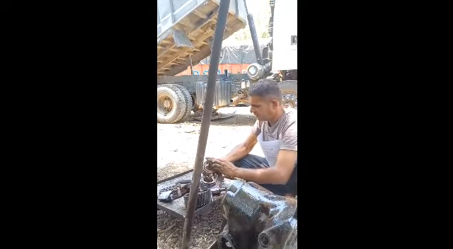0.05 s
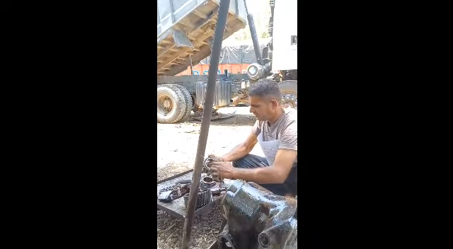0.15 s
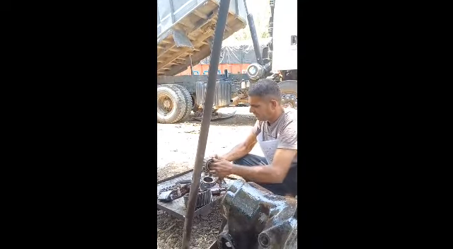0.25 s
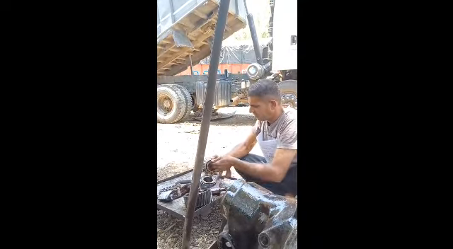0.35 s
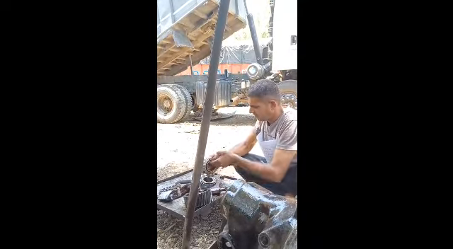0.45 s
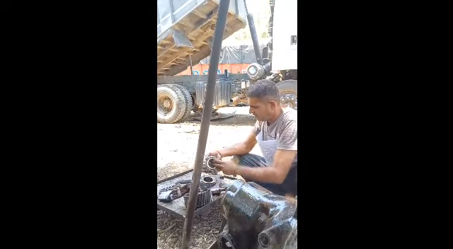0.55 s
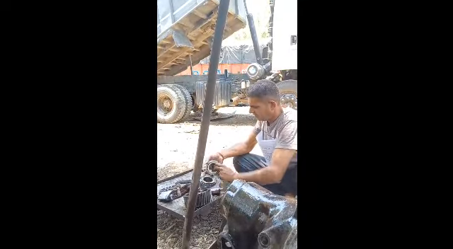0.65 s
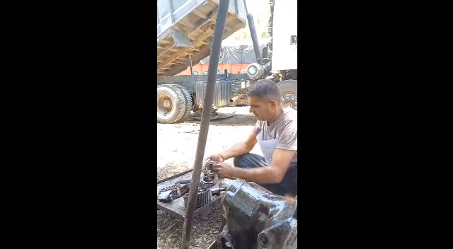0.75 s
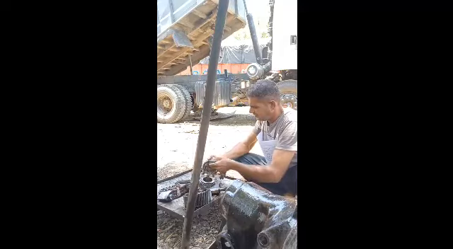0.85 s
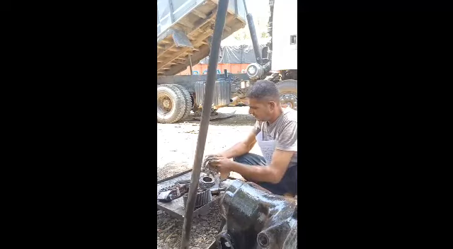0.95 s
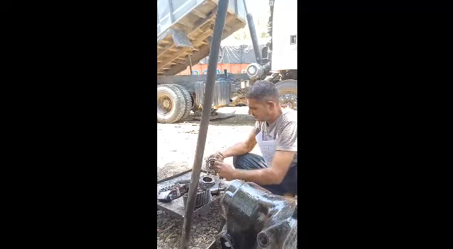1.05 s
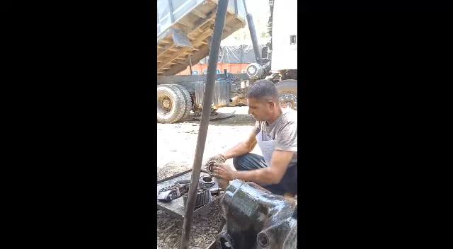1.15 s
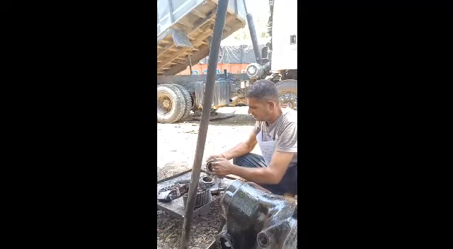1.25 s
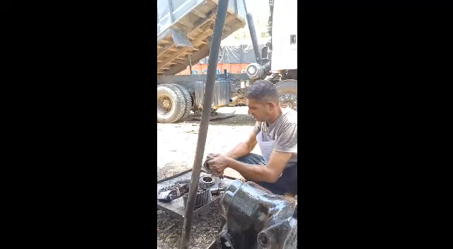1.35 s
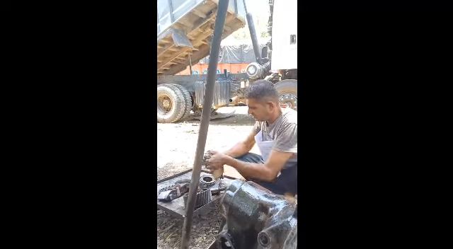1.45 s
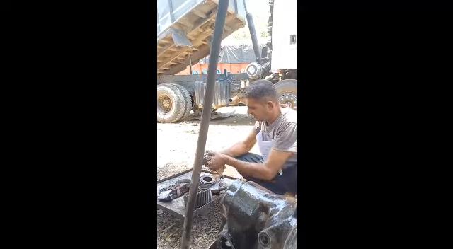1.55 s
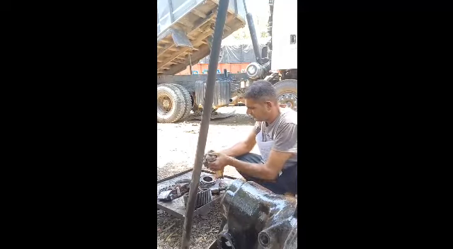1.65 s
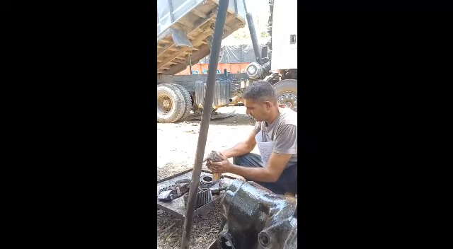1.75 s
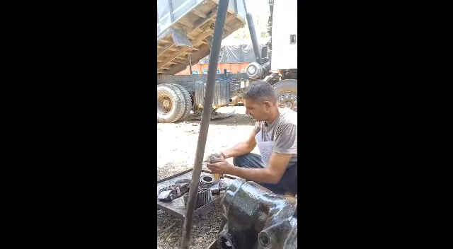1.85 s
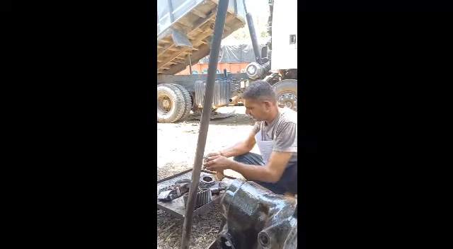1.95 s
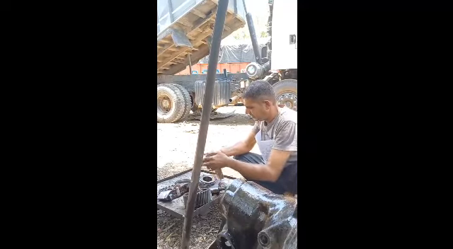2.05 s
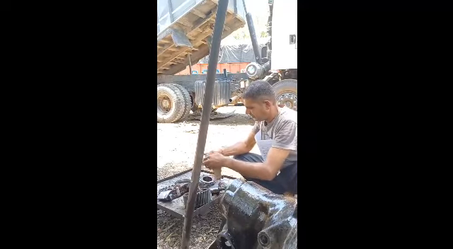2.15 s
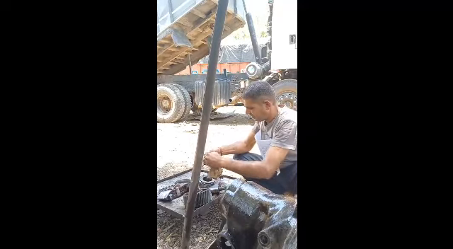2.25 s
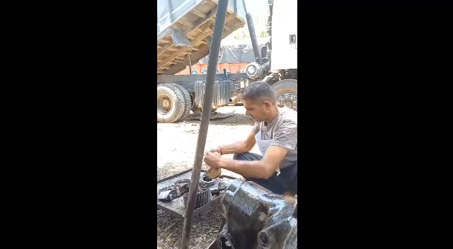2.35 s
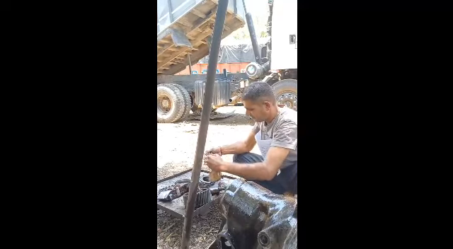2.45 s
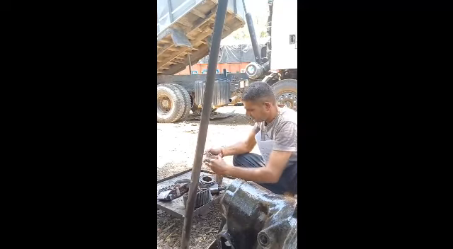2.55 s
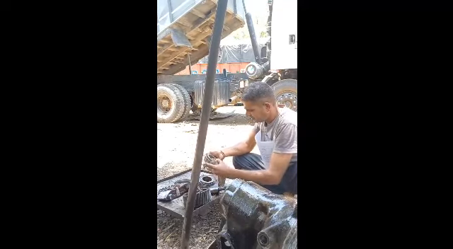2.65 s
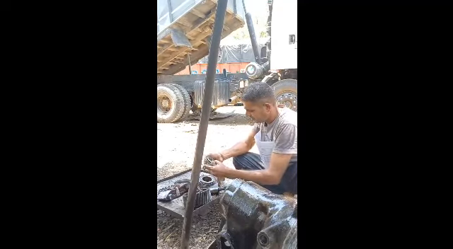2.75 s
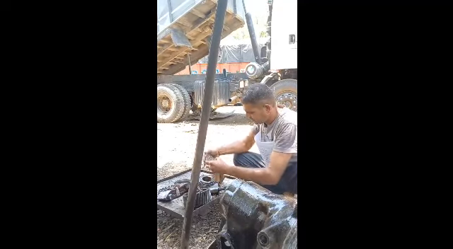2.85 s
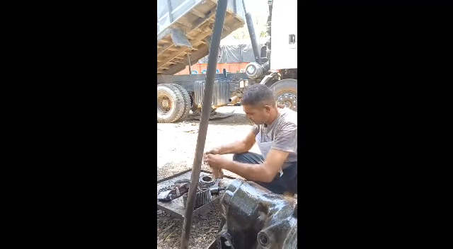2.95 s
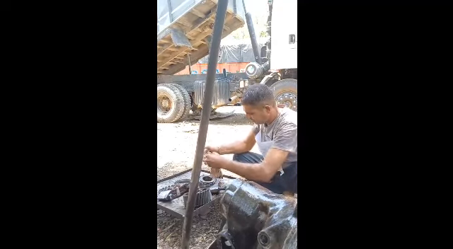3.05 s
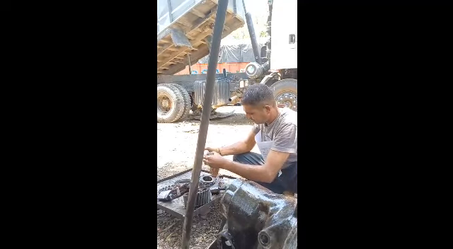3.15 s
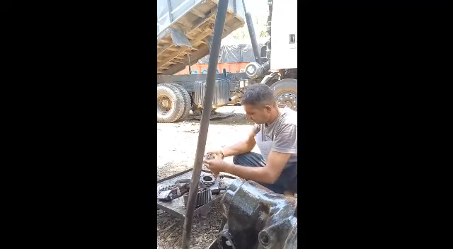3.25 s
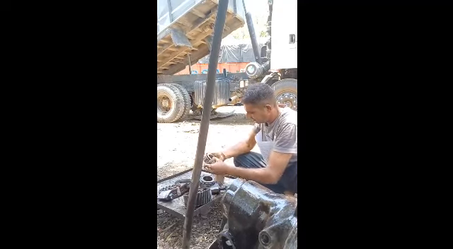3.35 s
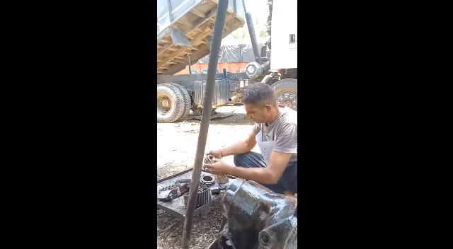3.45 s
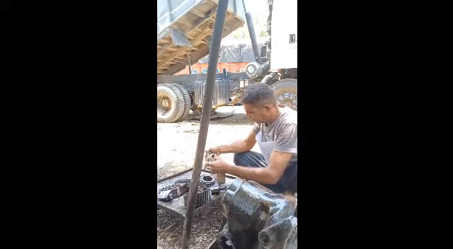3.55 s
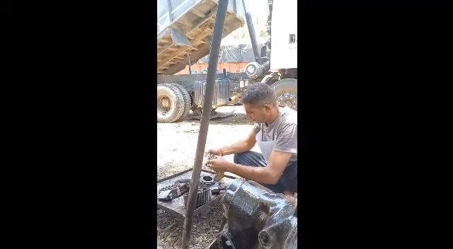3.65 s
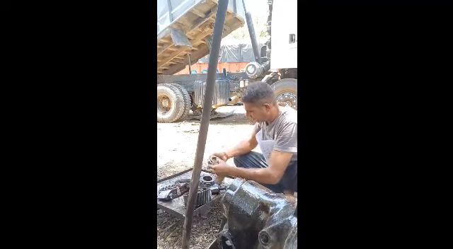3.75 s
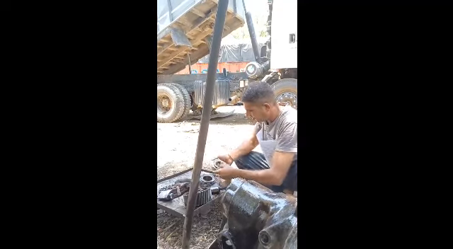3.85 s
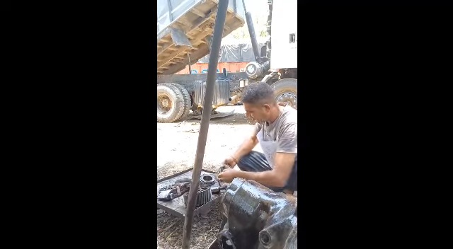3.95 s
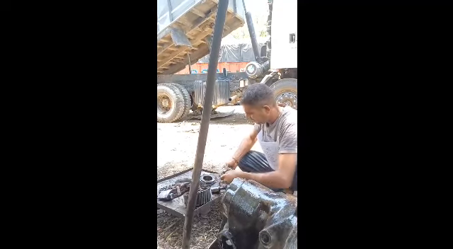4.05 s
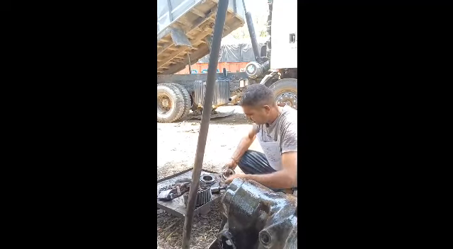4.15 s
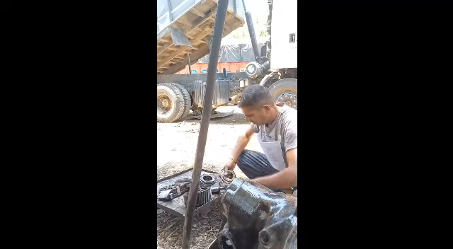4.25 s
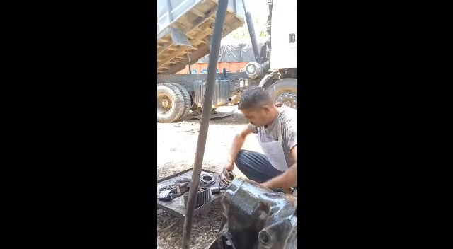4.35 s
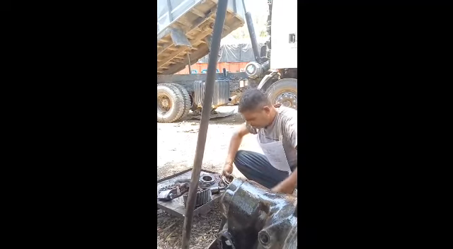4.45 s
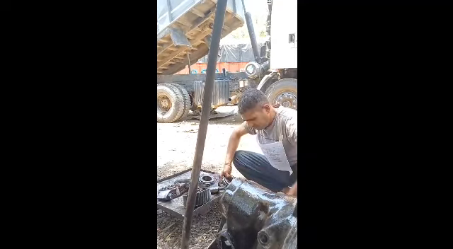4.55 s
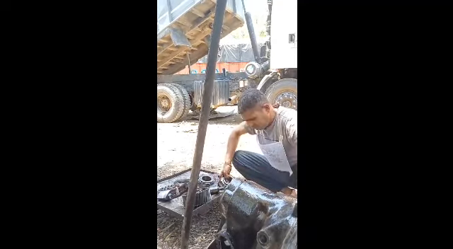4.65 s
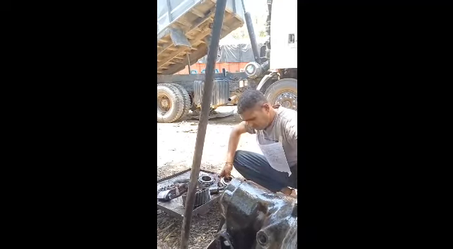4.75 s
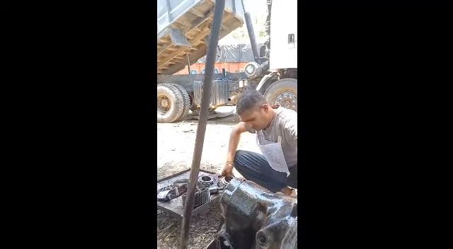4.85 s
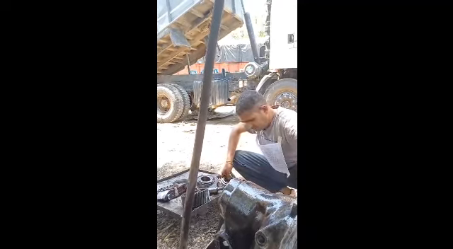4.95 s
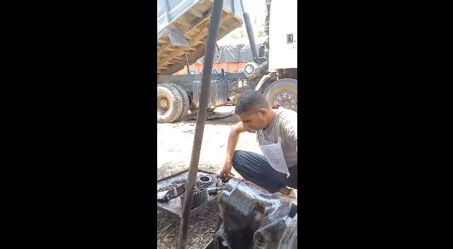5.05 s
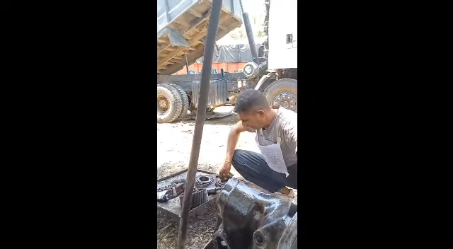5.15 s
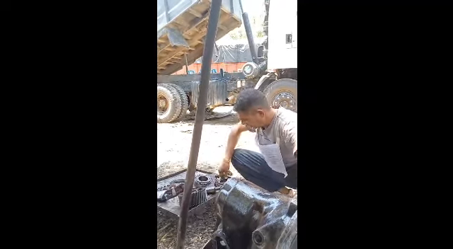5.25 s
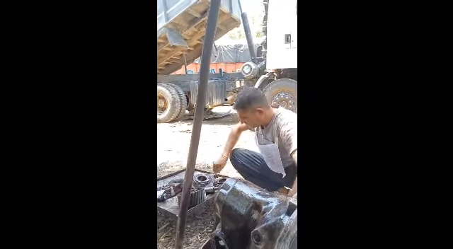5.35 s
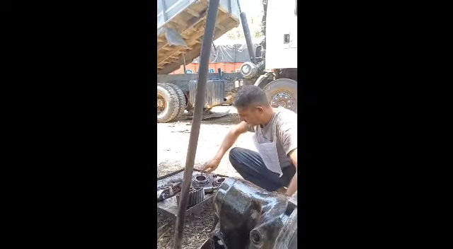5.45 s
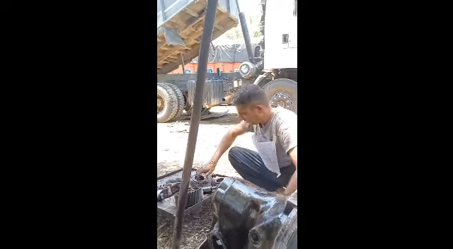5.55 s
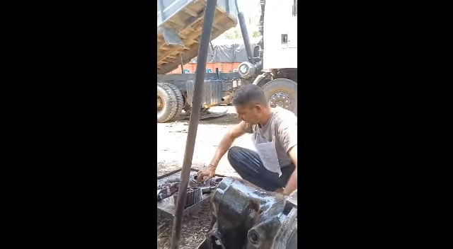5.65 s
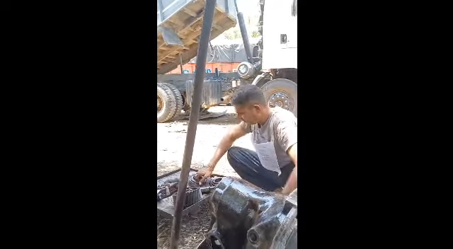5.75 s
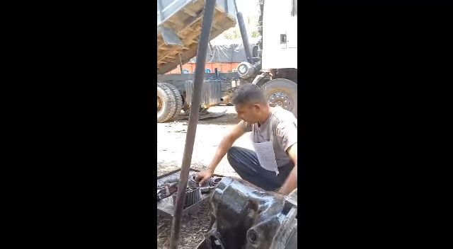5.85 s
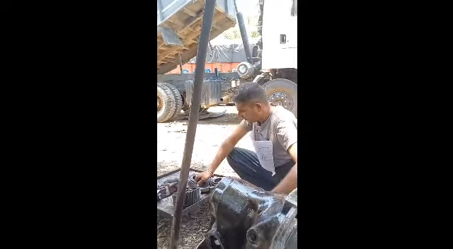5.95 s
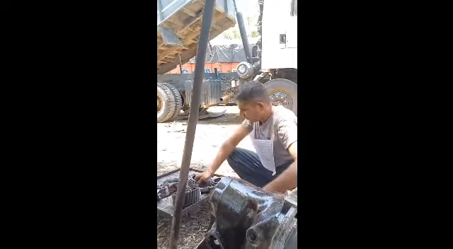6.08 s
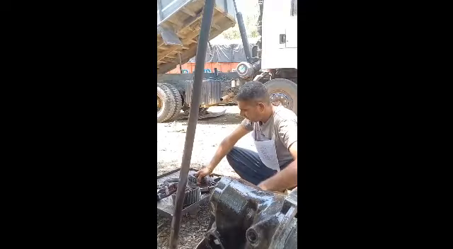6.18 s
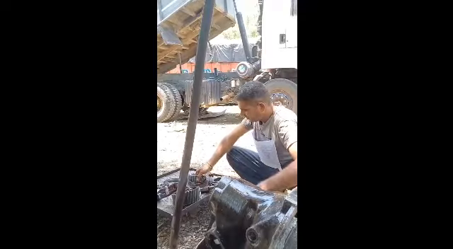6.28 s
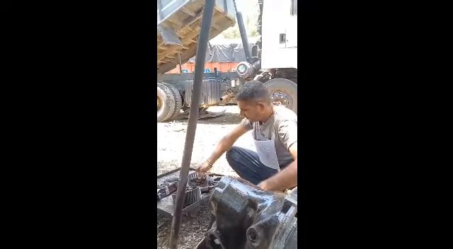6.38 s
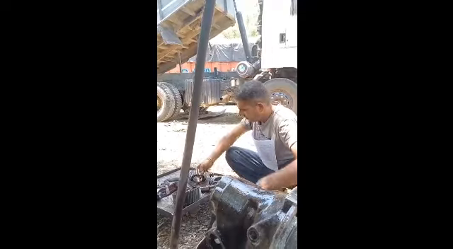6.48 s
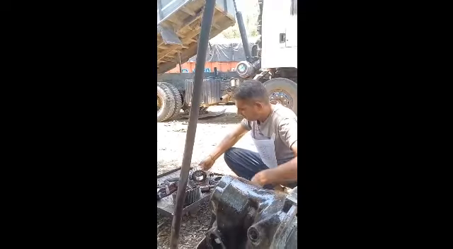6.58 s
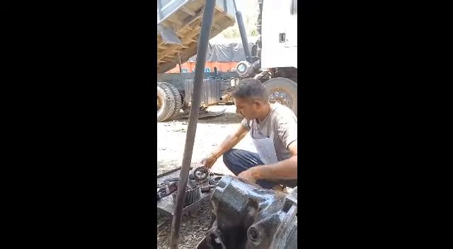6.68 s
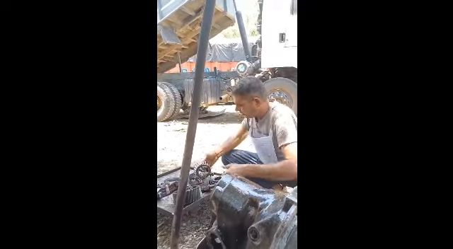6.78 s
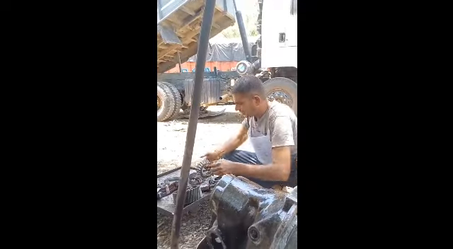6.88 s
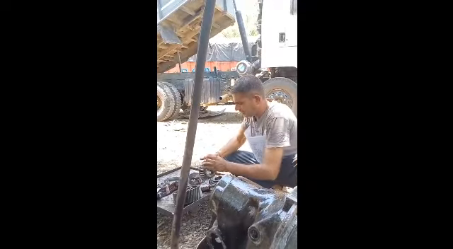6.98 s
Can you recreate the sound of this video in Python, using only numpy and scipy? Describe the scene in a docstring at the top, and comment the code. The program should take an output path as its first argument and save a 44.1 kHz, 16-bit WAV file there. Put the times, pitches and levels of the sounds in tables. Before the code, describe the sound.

Greasy metal gears and bearings click and grind in the hands, then a part bangs onto a steel plate over low outdoor rumble.

```python
"""Greasy gears and bearings click, clack and grind in a man's hands: noise bursts and rubbing through steel modes.
He sets parts on a steel plate with knocks and drags; dull thuds and slides, a few early, most after the plate,
are noise through resonances too. A tapped bearing ring chimes as a bank of decaying modes.
Thin squeaky peeps, soft tones and a faint, nearly steady thin high tone are wavering sines.
Wind and far engines rumble low, the open yard murmurs and hisses: filtered noise with drifting levels."""
import sys
import numpy as np
from scipy import signal
from scipy.fft import rfft, irfft
from scipy.io import wavfile
from scipy.ndimage import uniform_filter1d

SR = 44100
rng = np.random.default_rng(int(sys.argv[2]) if len(sys.argv) > 2 else 0)


def store_pcm(level_fs):
    """Save levels as 16-bit WAV."""
    pcm = np.round(np.clip(level_fs, -1, 1) * 32767).astype(np.int16)
    wavfile.write(sys.argv[1], SR, np.atleast_2d(pcm).T)


N = 309582
T = np.arange(N) / SR  # seconds

# All level_db and peak_db are nominal, before the trims in the source functions.
# Low, clack and top dB are relative to the row's peak or level.
# Parts knocking in the hands: start_s, peak_db, clack_db, top_db, chatter_t60_s, clack_hz, clink_hz
HAND_CLICKS = [(0.1269, -36.5, -11.5, -15, 0.33, 1760, 5860), (0.1575, -43.5, -0.5, 4, 0.075, 2660, 5840),
               (0.3189, -38, -0.5, 3, 0.17, 1800, 6230), (0.4927, -39.5, -8, 7.5, 0.13, 2580, 6800),
               (0.5415, -43.5, -4, 2, 0.9, 3270, 6110), (0.596, -33.5, 1.5, -1, 0.16, 2810, 7150),
               (0.629, -37, -8, -9, 0.034, 2480, 4500), (0.716, -39.5, -5, -12, 0.06, 2610, 5500),
               (0.8, -37.5, -25, -18, 0.069, 1970, 6160), (0.9145, -29, -14.5, -1.5, 0.3, 2280, 4530),
               (0.926, -35, -14, -10, 0.1, 2400, 4800), (0.9616, -46, 6.5, -19, 0.26, 2630, 6190),
               (1.178, -39.5, -16, 8, 0.11, 2650, 6510), (1.257, -43, -10, -4, 0.15, 3050, 6000),
               (1.277, -26, -7, -6, 0.15, 2430, 5900), (1.3637, -31.5, -14, 2, 0.33, 2280, 5800),
               (1.395, -33, -9.5, -17, 0.3, 2420, 5960), (1.4813, -53, 10.5, -21, 0.11, 2220, 6040),
               (1.506, -38.5, 0, -21, 0.22, 2130, 6350), (1.6137, -37.5, -4, -4, 0.24, 2310, 4730),
               (1.6506, -41, -15, -19, 0.12, 2250, 6630), (1.7031, -24.5, -8.5, -11, 0.19, 2780, 4800),
               (1.7415, -31.5, -5, -26, 0.14, 1980, 6000), (1.776, -50, 6.5, -19, 0.15, 1540, 6340),
               (1.881, -47, -4.5, 1, 0.7, 2070, 7200), (1.914, -44, -3.5, -26, 0.66, 2130, 4850),
               (1.9836, -44, -1, -5, 0.14, 2770, 4860), (2.0602, -38.5, -10.5, 0, 0.18, 2270, 4960),
               (2.102, -47.5, -1.5, -12.5, 0.31, 2890, 6100), (2.3266, -40, -8.5, -3.5, 0.22, 1930, 5000),
               (2.609, -51, -2, -1, 0.18, 2000, 6880), (2.626, -35, -9, -9, 0.35, 2030, 4440),
               (3.009, -44.5, 0.5, -3, 0.41, 2340, 5230), (3.0365, -46, -3, -21, 0.16, 2100, 6500),
               (3.0802, -38.5, -2.5, -13, 0.15, 2200, 5040), (3.1006, -31.5, -1.5, -10, 0.17, 2770, 4950),
               (3.1296, -42.5, 1, -22, 0.13, 2130, 6860), (3.212, -49.5, -1.5, -22, 0.092, 2220, 6000),
               (3.3156, -38, -3.5, -8, 0.22, 2360, 6300), (3.332, -41, -3, -19, 0.083, 2350, 6240),
               (3.416, -43.5, -3.5, -20, 0.23, 2050, 6170), (3.6506, -48, -10, -3, 0.31, 1830, 6000),
               (3.6707, -35.5, -16, -13, 0.18, 2680, 6060), (3.692, -41.5, -1, 5, 0.19, 2360, 6150),
               (3.774, -36, -3.5, -14, 0.36, 2520, 6400), (3.799, -33.5, -8, -21, 0.25, 2450, 5860),
               (3.8361, -34.5, -6, -13, 0.083, 2720, 5040), (4.2351, -44, -19, -37, 0.31, 2080, 5750)]
# Parts grinding in the hands: time_s, level_db, low_db
HAND_GRIND = [(0.0, -83, 10), (0.17, -72, 4.5), (0.46, -65.5, 3.5), (0.68, -56, 1), (0.95, -62, 1.5),
              (1.23, -63, 2.5), (1.5, -64, -2.5), (1.6, -72.5, 1.5), (1.74, -64.5, 17.5), (2.12, -87, -39),
              (2.39, -77, 0), (2.69, -61, 0), (3.0, -73, -5), (3.28, -60.5, -5.5), (3.44, -62.5, -7.5),
              (3.63, -76.5, -0.5), (3.8, -51.5, -7), (3.97, -78.5, 0.5), (4.45, -76.5, 9)]
# Spectrum of the gears: frequency_hz, density_db (per Hz, relative)
GEAR_SPECTRUM = [(410, -40), (700, -12.5), (1160, 2), (1390, 1.5), (2270, 6.5), (3700, -6.5), (4820, -1.5),
                 (5360, -7), (6120, 1), (9100, -13.5), (11000, -14), (12500, -12), (13700, -12.5),
                 (15200, -7), (16500, -30)]
# Resonances of the gears, the last a broad lift in the treble: frequency_hz, width_hz, lift_db (over the
# spectrum)
GEAR_RESONANCES = [(4800, 160, 1.5), (5130, 130, 6), (6450, 120, -1), (6250, 120, -8), (7100, 130, 6),
                   (12670, 1650, 16)]

# Parts landing on the plate: start_s, peak_db, low_db, top_db, loudest_ring_hz
PLATE_KNOCKS = [(4.48, -36, -8, -28, 1220), (4.523, -9.5, -12, -34, 1026), (4.526, -3.5, -19, -11, 1545),
                (4.533, -14, -14, -21, 1280), (4.573, -18.5, -15, -30, 2480), (4.585, -26, -15, -16, 1640),
                (4.607, -27, 2, -11, 1100), (4.877, -34, -10, 2.5, 1610), (4.944, -45, -12, 0, 1580),
                (5.112, -18, -3, -15, 2200), (5.122, -20.5, 5, -0.5, 910), (5.142, -14.5, 6.5, -0.5, 1090),
                (5.151, -16.5, 5, -23, 1050), (5.171, -30, -19, 6, 1940), (5.204, -41, 8, -22, 902),
                (5.236, -23.5, 1.5, -7, 2300), (5.244, -27.5, 3.5, 0.5, 2410)]
# Parts dragged over the plate: peak_s, rise_s, fall_s, peak_db, low_db, top_db
PLATE_DRAGS = [(4.475, 0.041, 0.3, -59, -5, 2.5), (4.526, 0.008, 0.12, -29, 0, 5),
               (4.578, 0.042, 0.12, -34.5, -1, -5.5), (4.7, 0.042, 0.58, -61.5, -16, -12),
               (4.876, 0.052, 0.54, -54, -2, -2), (5.152, 0.06, 0.039, -28.5, 0.5, -0.5),
               (5.2, 0.11, 0.14, -42.5, 0.5, 4.5)]
# Spectrum of the plate: frequency_hz, density_db (per Hz, relative)
PLATE_SPECTRUM = [(76, -45), (130, -11), (264, -9.5), (413, -11), (476, -4.5), (713, -11), (1070, -10),
                  (1390, -14), (1570, -9), (3840, -21), (6760, -23), (8800, -28), (12700, -22),
                  (15500, -28.5), (16500, -69)]
# Resonances of the plate: frequency_hz, width_hz, lift_db (over the spectrum)
PLATE_RESONANCES = [(235.3, 50, 7), (473.3, 26, 7.5), (510, 46, 5), (587, 20, -3), (746, 40, 0.5),
                    (1069, 27, -0.5), (1164, 14, 9.5), (1248, 26, 6.5), (1500, 36, 0), (1646, 34, 9.5),
                    (1970, 8.8, 8.5), (2060, 40, 5.5), (2300, 45, 6.5), (2543, 48, 7), (3494, 57, 8),
                    (4740, 49, 9.5)]

# Dull bumps: start_s, peak_db, low_db, loudest_ring_hz
DULL_THUDS = [(1.0315, -32, -10, 584), (2.0617, -61, -5, 590), (5.5494, -64, 2, 536),
              (5.588, -38.5, -21, 530), (6.2271, -32.5, 2, 1440), (6.244, -49, -7, 1570),
              (6.274, -45, 16, 735), (6.355, -41, -9, 1460), (6.432, -37.5, -21, 1870),
              (6.4643, -26, -22, 1450), (6.5375, -30, -14, 1750), (6.565, -34, -17, 1490)]
# Dull slides: peak_s, rise_s, fall_s, peak_db, low_db, top_db
DULL_SLIDES = [(2.075, .04, 0.12, -65, 15, 15), (5.55, 0.2, .06, -69, 16, 0),
               (5.598, .08, 0.14, -53, -16, -10.5), (6.1, 0.25, 0.49, -61.5, 1.5, -13),
               (6.236, 0.078, 0.066, -41, -0.5, -9.5), (6.286, .03, 0.35, -51.5, 1.5, -13),
               (6.472, .06, 0.099, -45.5, -16, -25), (6.536, .02, 0.11, -52.5, -1.5, -2),
               (6.65, 0.26, 0.27, -68.5, -4.5, 7)]
# Spectrum of the thuds and slides: frequency_hz, density_db (per Hz, relative)
DULL_SPECTRUM = [(120, -36), (200, 3.5), (606, -9.5), (784, -1), (943, -5.5), (1470, -8), (3190, -30),
                 (3980, -30.5), (5760, -36), (7060, -33), (15000, -47), (16500, -43)]
# Resonances of the thuds and slides: frequency_hz, width_hz, lift_db (over the spectrum)
DULL_RESONANCES = [(270, 18, 10), (522, 46, 9.5), (708, 60, 6.5), (1165, 21, 4.5), (1525, 30, 6),
                   (1894, 78, 4.5), (4940, 340, 7)]

# Taps on the bearing ring: start_s, peak_db
RING_TAPS = [(6.1942, -41), (6.2055, -63), (6.219, -57), (6.245, -62), (6.263, -64), (6.4824, -62),
             (6.5641, -54)]
# Free modes of the bearing ring: frequency_hz, level_db, t60_s
RING_PARTIALS = [(1535, 1, 0.086), (3994, -3, 0.21), (4040, -5.5, 0.15), (3970, -21, .06), (7200, 1, 0.083),
                 (7316, -4, 0.09), (7510, -5, 0.076), (10950, -4.5, 0.055), (12200, -15, 0.15),
                 (14960, -4, 0.068)]

# Thin rough squeaky peeps, perhaps metal rubbing: start_s, length_s, first_hz, middle_hz, last_hz, level_db
PEEP_NOTES = [(3.15, .165, 5850, 6260, 5950, -65), (3.79, .13, 6100, 6020, 6000, -59),
              (6.935, .15, 5900, 6080, 6050, -61)]
# Soft tones, two low and one higher: start_s, length_s, first_hz, middle_hz, last_hz, level_db
SOFT_NOTES = [(3.735, .22, 615, 625, 630, -72), (5.52, .1, 535, 540, 545, -66),
              (6.04, .3, 1490, 1500, 1510, -62)]
# A faint, nearly steady thin high tone: start_s, length_s, first_hz, middle_hz, last_hz, level_db
STEADY_TONE = (5.3, .8, 3475, 3475, 3475, -84)

# Wind and engine rumble: time_s, level_db
RUMBLE_LEVEL = [(0.0, -57), (0.41, -54), (0.51, -50.5), (1.06, -51.5), (1.25, -54.5), (1.47, -48),
                (1.8, -54.5), (2.87, -53), (3.28, -47.5), (3.68, -48.5), (3.9, -56), (4.11, -50.5),
                (4.44, -50), (4.57, -54.5), (5.0, -56.5), (5.43, -49), (6.76, -52.5), (7.02, -63)]
# Spectrum of the rumble: frequency_hz, density_db (per Hz, relative)
RUMBLE_SPECTRUM = [(12, -68), (20, -48), (51, -7), (80, 1), (130, -6), (177, -8.5), (200, -17.5),
                   (334, -26), (372, -27), (403, -35), (500, -37.5), (650, -77), (1100, -120)]
# Engine drone: frequency_hz, width_hz, lift_db (over the rumble)
ENGINE_RESONANCES = [(81.4, 5.4, 3), (125.4, 9.6, 2)]
# Murmur of the yard: time_s, level_db
MURMUR_LEVEL = [(0.0, -63), (0.68, -57), (1.39, -65.5), (2.11, -61.5), (2.4, -66), (4.65, -65.5),
                (5.05, -62), (5.3, -66), (6.04, -62), (6.4, -62), (6.73, -66), (7.02, -64)]
# Treble hiss and rustle of the yard: time_s, level_db
HISS_LEVEL = [(0.0, -63), (0.17, -58.5), (0.68, -54), (0.88, -55.5), (1.2, -56), (1.7, -64), (2.11, -62),
              (2.38, -65), (2.75, -59.5), (3.3, -66.5), (3.81, -64.5), (3.97, -69), (4.4, -75.5),
              (4.65, -65), (5.02, -51.5), (5.14, -60), (5.33, -78), (5.55, -62), (5.7, -62.5), (5.75, -58),
              (5.8, -68), (6.2, -63), (7.02, -66.5)]
# Spectrum of the yard: frequency_hz, density_db (per Hz, relative)
YARD_SPECTRUM = [(120, -30), (200, -7.5), (354, -20.5), (640, -23.5), (715, -24.5), (892, -23),
                 (2130, -29.5), (2370, -28.5), (2560, -33), (3370, -38), (4370, -42.5), (7060, -33.5),
                 (8030, -40.5), (15300, -33.5), (16500, -47)]


def hands(rough):
    """Gears and bearings: short cracks, chatter and grinding ring the steel, with a clack and a clink per click."""
    touch = dict(crack_db=-6, crack_s=.0025, chatter_db=-10)
    s, peak_db, clack_db, top_db, t60, clack_hz, clink_hz = np.transpose(HAND_CLICKS)
    grind_top_db = -6
    grind = [(when, db, low, grind_top_db) for when, db, low in HAND_GRIND]
    # the broad bands sit under the clack and the clink
    blows = np.transpose([s, peak_db - 3, clack_db - 12, top_db, t60])
    body = steel(blows, [grind], GEAR_SPECTRUM, GEAR_RESONANCES, (3600, 7800), rough,
                 shared=(.45, .3, .15), patchy_db=-2.0, **touch)
    clacks = accents(s, peak_db + clack_db + 16.5, t60, clack_hz, rough, sharpness=3.66, shared=0.59, **touch)
    clinks = accents(s, peak_db + 6, t60, clink_hz, rough, sharpness=6, shared=.3, **touch)
    return body + clacks + clinks


def plate(fine):
    """Parts land on the steel plate and drag over it, exciting its resonances with impacts and friction noise."""
    chatter_t60_s = 0.036
    knocks = [(s, db, low, top, chatter_t60_s, hz) for s, db, low, top, hz in PLATE_KNOCKS]
    return heavy(knocks, slides(PLATE_DRAGS), PLATE_SPECTRUM, PLATE_RESONANCES, (800, 3500), fine,
                 accent_db=17, sharpness=11, crack_db=-11, crack_s=.0025, chatter_db=-20)


def thuds_and_slides(rough):
    """Dull thuds and slides, a few early, most after the plate: longer cracks and chatter than on the plate."""
    top_db, chatter_t60_s = -26, .11
    thuds = [(s, db, low, top_db, chatter_t60_s, hz) for s, db, low, hz in DULL_THUDS]
    return heavy(thuds, slides(DULL_SLIDES), DULL_SPECTRUM, DULL_RESONANCES, (1200, 3500), rough,
                 accent_db=22.5, sharpness=9.7, crack_db=-15.0, crack_s=0.005, chatter_db=-22.5)


def ring():
    """Free modes of the bearing ring; every tap rattles a moment and excites them in other proportions."""
    share_db = 1.3 * rng.standard_normal((len(RING_TAPS), len(RING_PARTIALS)))
    rattle = undb(-25.0) * np.exp(-T[:SR // 10] / 0.023)
    out = np.zeros((2, N))
    first = int(RING_TAPS[0][0] * SR)
    for k, (hz, db, t60) in enumerate(RING_PARTIALS):
        rattles, hits = np.zeros(N), np.zeros(N)
        for (s, peak_db), tap_db in zip(RING_TAPS, share_db[:, k]):
            at = int(s * SR)
            gain_db = peak_db + db + tap_db
            rattles[at:at + len(rattle)] += undb(gain_db) * rattle
            hits[at] = undb(gain_db - 12.0)
        drive = hits + rattles * pair(0.14)
        pole = np.exp(2j * np.pi * hz / SR - np.log(1000) / (t60 * SR))
        ringing = signal.lfilter([1], [1, -pole], drive[:, first:]).imag
        # the ringing flutters unsteadily in level
        out[:, first:] += ringing * undb(3.5 * walk(400)[first:])
    return out


def peeps():
    """Thin squeaky high tones, rough in level and louder on the right."""
    notes = sum(tone(note(*row), flutter_db=2.5, waver=.006, rasp_db=3) for row in PEEP_NOTES)
    return notes * undb([[-3], [3]])


def soft_tones():
    """Soft sines that waver widely in pitch."""
    return sum(tone(note(*row), flutter_db=2.2, waver=.025, rasp_db=3) for row in SOFT_NOTES)


def steady_tone():
    """A faint thin high sine, nearly steady in pitch and unsteady in level."""
    return tone(note(*STEADY_TONE), flutter_db=4, waver=.002, rasp_db=2)


def wind_and_engines():
    """Gusty low noise with engine resonances, nearly alike in both channels."""
    level_db = table_curve(RUMBLE_LEVEL, column=1) + 3.0 + 1.5 * walk(12)
    rumble = filtered(pair(0.9) * undb(level_db), response(RUMBLE_SPECTRUM, ENGINE_RESONANCES, size=16384))
    return rumble * undb([[-.4], [.4]])


def yard():
    """Murmur and treble hiss from all sides: wide noise in a low and a high band, each drifting in level."""
    murmur_db = table_curve(MURMUR_LEVEL, column=1) + 2.0 + 1.27 * walk(3.59)
    murmur = filtered(pair(0.22) * undb(murmur_db), response(YARD_SPECTRUM, hi_hz=2840.0))
    hiss_db = table_curve(HISS_LEVEL, column=1) + 1.0 * walk(3)
    hiss = filtered(pair(0.019) * undb(hiss_db), response(YARD_SPECTRUM, lo_hz=3040.0))
    return (murmur + hiss) * undb([[-.6], [.6]])


def heavy(blows, rubs, spectrum, resonances, edges_hz, rough, accent_db, sharpness, **touch):
    """Bumping and sliding through one body, plus the loudest ring of each blow."""
    s, peak_db, _, _, t60, hz = np.transpose(blows)
    body = steel(blows, rubs, spectrum, resonances, edges_hz, rough,
                 shared=(.95, .7, .3), patchy_db=-0.5, **touch)
    return body + accents(s, peak_db + accent_db, t60, hz, rough, sharpness, shared=0.95, **touch)


def steel(blows, rubs, spectrum, resonances, edges_hz, rough, shared, patchy_db, **touch):
    """Blows and rubbing drive three bands of one body; each flickers alone, its channels sharing less in the treble."""
    force = np.zeros((3, N))  # low, middle, top
    for rows in rubs:
        band_db = np.array([table_curve(rows, column=2), 0 * T, table_curve(rows, column=3)])
        force += undb(table_curve(rows, column=1) + band_db) * rough
    for s, peak_db, low_db, top_db, t60, *_ in blows:
        span = quarter_second(s)
        force[:, span] += undb([[low_db], [0], [top_db]]) * blow(peak_db, t60, rough[span], **touch)
    out = np.zeros((2, N))
    for drive, share, lo, hi in zip(force, shared, (0., *edges_hz), (*edges_hz, 1e6)):
        noise = drive * undb(patchy_db * walk(70)) * pair(share)
        out += filtered(noise, response(spectrum, resonances, lo, hi, size=4096))
    return out


def accents(s, peak_db, t60, hz, rough, sharpness, shared, **touch):
    """Grip and point of contact lift one resonance, at its own pitch for each blow."""
    out, noise = np.zeros((2, N)), pair(shared)
    for k in range(len(s)):
        span = quarter_second(s[k])
        drive = noise[:, span] * blow(peak_db[k], t60[k], rough[span], **touch)
        peak = signal.iirpeak(hz[k], sharpness, fs=SR)
        out[:, span] += signal.lfilter(*peak, signal.lfilter(*peak, drive))
    return out


def blow(peak_db, t60, rough, crack_db, crack_s, chatter_db):
    """Force of one blow: a short crack, with a fading chatter."""
    age = T[:len(rough)]
    crack = undb(crack_db) * np.exp(-age / crack_s)
    chatter = undb(chatter_db - 60 * age / max(t60, .005)) * rough
    return undb(peak_db) * (crack + chatter)


def slides(rows):
    """Curves of slides: each swells to its peak and dies away, straight in dB."""
    fade_db = 30  # gained over rise_s, lost over each fall_s
    return [[(s - rise, db - fade_db, low, top), (s, db, low, top), (s + 2 * fall, db - 2 * fade_db, low, top)]
            for s, rise, fall, db, low, top in rows]


def grit(per_s, spread_db, top_db, grain_s):
    """Envelope of tiny contacts of uneven size over a smooth bed; rms 1."""
    sizes = undb(np.minimum(spread_db * rng.exponential(size=N), top_db))
    hits = (rng.random(N) < per_s / SR) * sizes
    env = 1 + signal.lfilter([1], [1, -np.exp(-1 / (grain_s * SR))], hits)
    return env / np.sqrt(np.mean(env ** 2))


def note(start, length, first_hz, middle_hz, last_hz, db):
    """Curve of one note: the pitch bends smoothly through three values, the level arches."""
    u = np.linspace(-1, 1, 21)
    hz = middle_hz + (last_hz - first_hz) / 2 * u + ((first_hz + last_hz) / 2 - middle_hz) * u ** 2
    edge_db = 7  # how far the ends lie under the middle
    return np.transpose([start + length * (u + 1) / 2, hz, db - edge_db * u ** 4])


def tone(rows, flutter_db, waver, rasp_db):
    """A sine, unsteady in pitch and level, with a quick rasp."""
    hz = table_curve(rows, column=1, off=2.5) * (1 + waver * walk(250))
    db = table_curve(rows, column=2) + flutter_db * walk(60) + rasp_db * walk(700)
    return np.sqrt(2) * undb(db) * np.sin(2 * np.pi * np.cumsum(hz) / SR)


def response(spectrum, resonances=(), lo_hz=0., hi_hz=1e6, size=8192):
    """Minimum-phase impulse response of a spectrum with resonances on top, cut to a band; power gain 1."""
    f = np.arange(size // 2 + 1) * SR / size + 1
    hz, db = np.transpose(spectrum)
    power = undb(2 * np.interp(np.log(f), np.log(hz), db))
    power = power * (1 + sum(undb(2 * d) / (1 + (2 * (f - m) / w) ** 2) for m, w, d in resonances))
    power = power / (1 + (lo_hz / f) ** 8) / (1 + (f / hi_hz) ** 8)
    # folding the cepstrum makes the response causal
    cepstrum = irfft(np.log(power + 1e-14) / 2)
    cepstrum[1:size // 2] *= 2
    cepstrum[size // 2 + 1:] = 0
    h = irfft(np.exp(rfft(cepstrum)))
    return h / np.sqrt(np.sum(h ** 2))


def filtered(x, h):
    """Both channels through one response."""
    return signal.oaconvolve(x, h[None], axes=1)[:, :N]


def pair(shared):
    """Left and right noise with the part `shared` of their power in common."""
    shared = np.clip(shared, 0, 1)
    common = rng.standard_normal(N)
    return np.sqrt(shared) * common + np.sqrt(1 - shared) * rng.standard_normal((2, N))


def walk(rate):
    """Random levels, `rate` per second, joined by slopes; spread near 1."""
    k = int(SR / rate)
    steps = np.repeat(rng.standard_normal(N // k + 1), k)
    return 1.4 * uniform_filter1d(steps, k)[:N]


def table_curve(rows, column, off=-120.):
    """One column of a table as a curve over time, at `off` outside its span."""
    rows = np.array(rows)
    return np.interp(T, rows[:, 0], rows[:, column], off, off)


def quarter_second(s):
    """Samples of the quarter second from time s."""
    return slice(int(s * SR), int(s * SR) + SR // 4)


def undb(db):
    """dB to amplitude gain."""
    return 10 ** (np.asarray(db) / 20)


def scene():
    """The work a little to the right, the yard all round."""
    rough = grit(per_s=700, spread_db=2.5, top_db=7, grain_s=.002)
    # the flat plate chatters more evenly
    fine = grit(per_s=1500, spread_db=1.5, top_db=4, grain_s=.002)
    work = hands(rough) * undb([[-1.7], [1.7]])
    work += (plate(fine) + thuds_and_slides(rough)) * undb([[-.8], [.8]])
    work += ring() * undb([[-.4], [.4]])
    work[0] = np.roll(work[0], 2)  # the left channel hears the work 2 samples later
    return work + peeps() + soft_tones() + steady_tone() + wind_and_engines() + yard()


def record(dry):
    """The phone cuts the top: a steep elliptic low-pass at 16.1 kHz."""
    return signal.sosfilt(signal.ellip(10, .2, 80, 16100, fs=SR, output="sos"), dry)


dry = scene()
out = record(dry)
store_pcm(out)
```